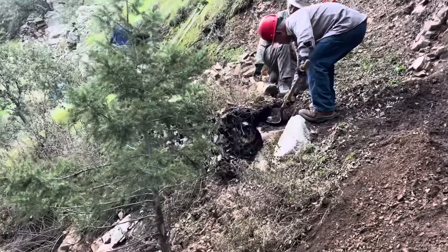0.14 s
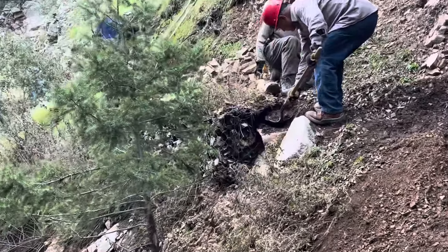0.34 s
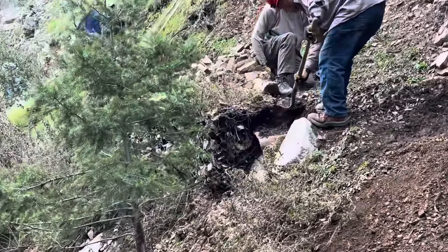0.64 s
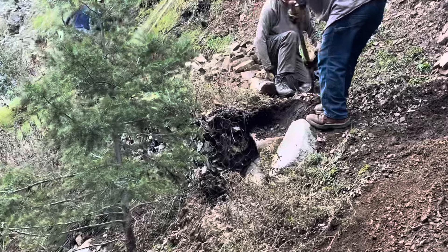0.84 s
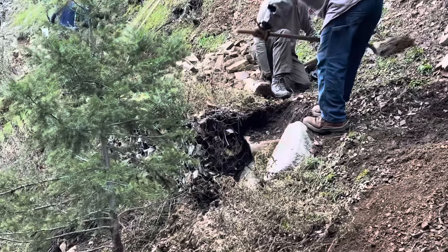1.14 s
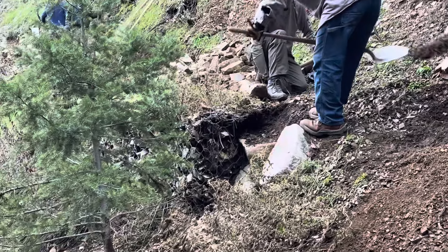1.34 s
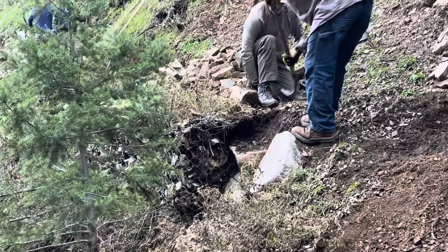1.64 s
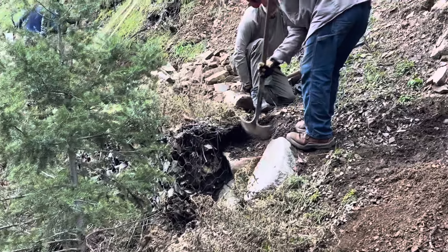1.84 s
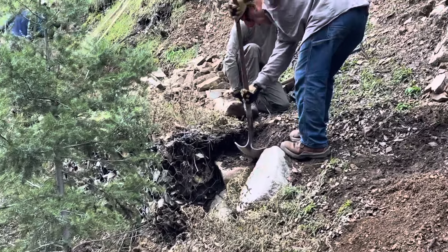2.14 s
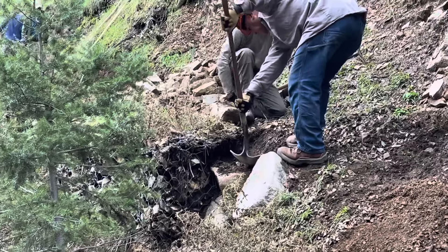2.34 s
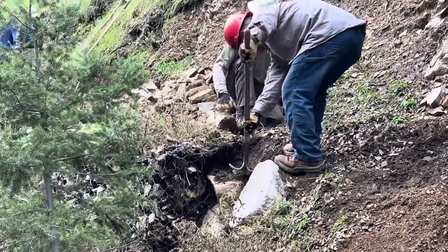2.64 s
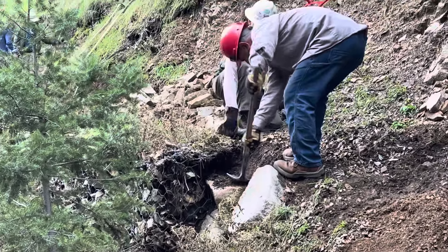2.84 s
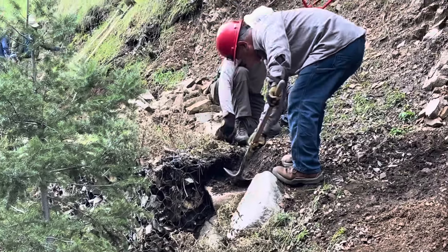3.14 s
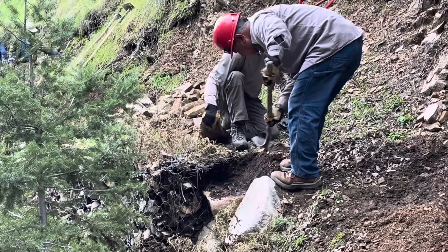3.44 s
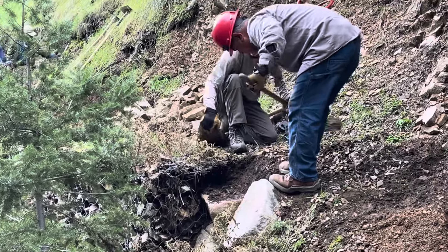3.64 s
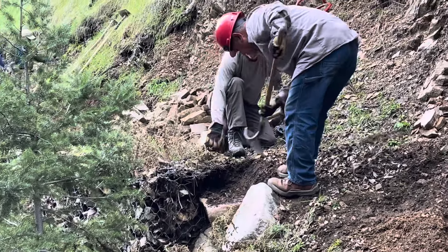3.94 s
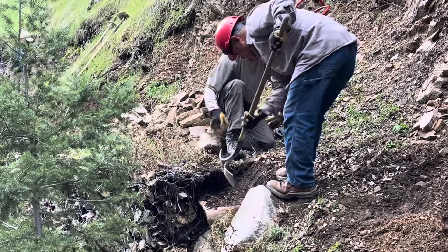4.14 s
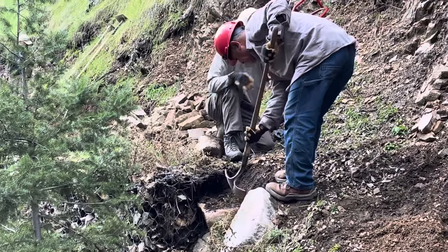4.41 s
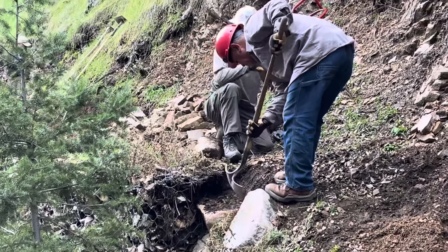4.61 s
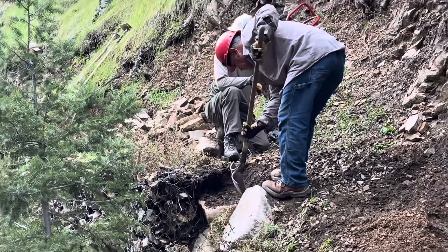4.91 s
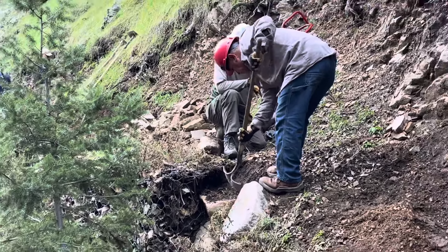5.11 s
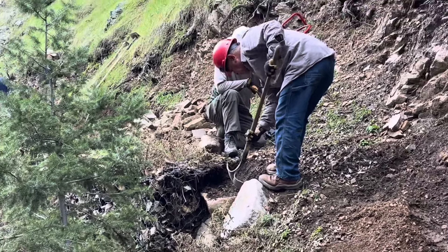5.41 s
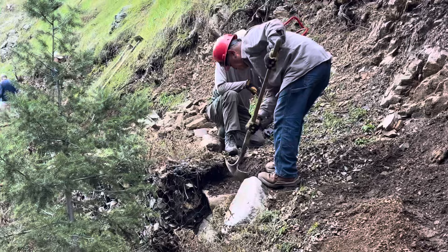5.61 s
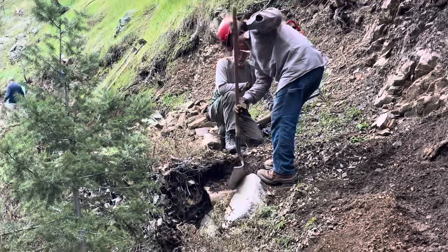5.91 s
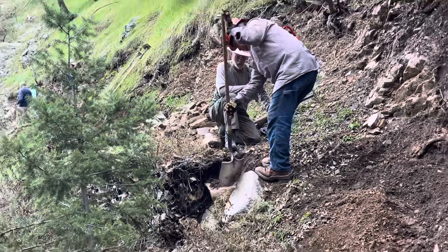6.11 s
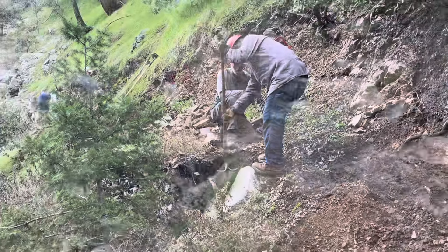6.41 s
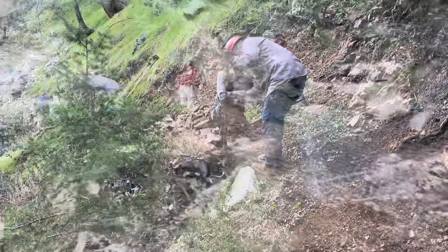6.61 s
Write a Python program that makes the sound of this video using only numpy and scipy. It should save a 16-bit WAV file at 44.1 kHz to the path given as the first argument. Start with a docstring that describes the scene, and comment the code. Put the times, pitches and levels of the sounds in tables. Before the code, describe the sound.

A steel shovel digs stony ground a few metres from a stereo microphone on an open hillside, over a quiet valley hush. From 0 to 1 s, dry grit and dull soil shift in short strokes, with low soft thuds and pebble ticks. Light, faintly ringing scrapes touch stone at 1.0-1.3 s; more pebbles click near 1.5. At 2.0 s a fast, hard volley crunches and clanks, then gravel scrapes and slides until about 3 s with a very faint rising hollow tone. A weak breeze rumble fades out by then. From 3 to 4.2 s only sparse grit and stone ticks remain. A heavy double crunch lands at 4.3 s, a looser cluster of clanks at 4.8-5.1, then scraping spills. A sharp single blow with a bright pebble click comes at 5.9, and a dense final volley at 6.3-6.5, trailing into trickling earth. Rings are short and damped, the slope's echo faint.

```python
"""A steel shovel digs into a stony hillside a few metres away, in the open air, heard through two microphone ports.
Under a quiet valley hush, grit trickles, clods thud and pebbles tick; a breeze rumbles on the microphone, gone by 3 s.
Light blows from 1 s are bursts of fractures ringing the blade's modes; a heavy volley bites at 2 s, then the load
scrapes and slides on with a rising hollow note. Heavy blows return near 4.3, 4.8, 5.9 and 6.4 s, each followed by
scraping grit. Throughout, nearby ground scatters the sound (noise tails) and the slope adds a faint short echo."""
import sys
import numpy as np
from scipy import signal
from scipy.fft import rfft, irfft, next_fast_len
from scipy.io import wavfile
from scipy.ndimage import uniform_filter1d

SR = 44100
rng = np.random.default_rng(int(sys.argv[2]) if len(sys.argv) > 2 else 0)


def int16_out(signal):
    """Quantize to a 16-bit WAV file."""
    q = np.round(np.clip(np.atleast_2d(signal).T, -1, 1) * 32767)
    wavfile.write(sys.argv[1], SR, q.astype(np.int16))


N = 298288
TIME = np.arange(N) / SR
RING_TIME = TIME[:SR // 2]  # half a second, the longest single event

# Blade meets stone. Each row: start [s], crunch level [dB], crunch decay to 1/e [s], ring re crunch [dB],
# blade flex [dB], freedom [0 buried to 1 in air], tilt [dB/octave], stone pitch [Hz], stone level [dB].
BLOWS = [(1.017, -50, 0.056, -3, -74, .94, -3, 1250, -49),
         (1.160, -47, 0.019, -7, -74, 0.33, -6, 1515, -49.5),
         (1.313, -48, 0.013, 9, -84, 0.9, 4, 4180, -51),
         (1.990, -28, .013, -3.5, -47, 0.48, -3.5, 2050, -39),
         (2.017, -30, 0.034, -0.5, -47, 0.31, 1.5, 3650, -28),
         (2.028, -24.5, 0.01, -1, -35, 0.3, 2.5, 2790, -26.5),
         (2.056, -28, .015, -19, -31, 0.49, -5, 1157, -29),
         (2.068, -35.5, 0.028, -8.5, -23, 0.3, .2, 3790, -33),
         (2.436, -46, 0.017, 3, -60, .33, -5, 625, -52), (2.914, -48, .029, -5, -62, 0.3, 0, 2950, -36.5),
         (4.2614, -27, 0.01, -4.5, -35, 0.17, -0.5, 700, -26),
         (4.267, -26, .015, 2.5, -36.5, 0.18, -1.8, 1147, -34),
         (4.279, -33.5, 0.031, -5, -41.5, 0.48, 0.3, 510, -27.5),
         (4.364, -43.5, 0.016, -18, -72, 0.4, -2.5, 3620, -50),
         (4.389, -48.5, 0.0052, 10.5, -74, 0.64, 0.4, 2900, -43.5),
         (4.777, -32, 0.02, 1.5, -41, 0.62, -2.5, 1560, -52),
         (4.847, -37, 0.012, 4.5, -63, 0.52, 1.5, 1876, -30),
         (4.88, -33, 0.029, -10.5, -53, 0.7, -1, 2105, -30.5),
         (4.892, -38.5, 0.045, -9.5, -59, 0.29, 3.5, 1867, -32),
         (4.952, -39.5, 0.011, -9, -65, .39, 1, 2080, -42),
         (5.091, -47, 0.019, 4, -51, 0.27, -6.5, 705, -45.5),
         (5.564, -41, 0.015, -12, -76, 0.34, -2.2, 1720, -45),
         (5.6, -54.5, 0.059, -3, -77, 0.6, 0, 2950, -49),
         (5.907, -28.5, 0.0087, -2.5, -42, 0.94, 0, 822, -31.5),
         (6.331, -29.5, 0.012, -5, -48.5, 0.99, 0, 920, -32.5),
         (6.404, -31, 0.041, -3, -33.5, 0.53, 0, 1250, -31.5),
         (6.428, -26, 0.0068, -5, -36, 0.43, 7, 1000, -27.5),
         (6.461, -32, 0.027, -15, -38.5, .55, -4.5, 2560, -48),
         (6.49, -31, 0.024, -4, -54, 0.15, -3, 952, -31.5),
         (6.511, -38.5, 0.013, -10, -32.5, .22, 6, 2700, -43),
         (6.7232, -49, 0.0085, 2, -62, 0.22, 9, 590, -50.5)]
# Modes of the blade. Each row: pitch [Hz], level struck edge-on [dB],
# level when stones glance along the face [dB], time to die by 60 dB when free [s].
BLADE = [(318, -14, -7, .22), (545, -5, -8, .2), (704, -4, -12, .22), (826, -4, -14, .18),
         (978, -2, -12, .27), (1100, -6, -7, .2), (1230, -7, -11, .22), (1462, -4, -16, .28),
         (1600, -7, -20, .58), (1712, 0, -13, .45), (1780, -3, -18, .22), (1854, -1, -15, .3),
         (1927, 1, -13, .35), (2122, -3, -13, .28), (2350, -4, -4, .24), (2594, -6, 1, .38),
         (2804, -3, -2, .3), (2975, -3, -8, .22), (3215, -6, -9, .22), (3391, -7, -6, .27),
         (3448, -3, -10, .22), (3621, -4, -7, .22), (3705, -7, -6, .27), (4114, -9, 1, .28),
         (4176, -3, -6, .28), (4580, -8, -6, .18), (5205, -5, -10, .17), (5530, -7, -8, .2),
         (8380, -13, -14, .18), (8820, -12, -12, .13)]
# Pebbles knocking together. Each row: start [s], peak [dB], pitch [Hz], time for the chatter to die by 60 dB [s].
PEBBLES = [(.154, -42, 2000, 0.034), (.366, -32, 820, 0.065), (.381, -38, 2000, 0.012),
           (.409, -36, 1810, .012), (.639, -37.5, 4550, 0.043), (.919, -45, 885, 0.022),
           (1.2527, -34, 4160, .0091), (1.266, -38, 4400, 0.22), (1.469, -39, 4660, 0.0038),
           (1.509, -33, 3620, .025), (1.55, -31.5, 3930, 0.0071), (2.0228, -23, 3680, 0.0038),
           (2.329, -35.5, 4240, .012), (2.468, -26.5, 3080, 0.032), (2.508, -32.5, 3730, 0.031),
           (2.601, -36.5, 3070, 0.011), (3.344, -33.5, 3630, 0.081), (3.357, -32.5, 3460, 0.057),
           (3.542, -39, 7040, 0.013), (3.616, -47, 3620, 0.082), (4.101, -46.5, 6900, 0.0069),
           (4.3917, -34, 2900, 0.026), (4.572, -42.5, 1930, .025), (4.627, -40.5, 1970, 0.13),
           (5.31, -37, 2800, 0.014), (5.9076, -24.5, 5500, .07)]
# Clods, boots and the loaded blade on the ground. Each row: start [s], level [dB], pitch [Hz].
THUDS = [(.003, -40, 124), (.058, -46.5, 110), (.177, -34.5, 69.4), (.346, -37.5, 285), (0.717, -47.5, 175),
         (0.919, -36, 218), (1.336, -47, 213), (1.515, -34, 140), (1.522, -30.5, 73.7), (2.222, -41, 224),
         (2.983, -45, 297), (3.835, -44.5, 70), (4.279, -41.5, 76.7), (4.721, -48.5, 168),
         (4.785, -39, 205), (4.805, -39.5, 73.5), (4.86, -46, 80), (5.330, -50, 99), (5.42, -47.5, 121),
         (5.909, -40, 192), (6.405, -39, 170), (6.49, -36.5, 210), (6.555, -44.5, 74), (6.689, -42.5, 72)]
# Spectrum of crushed stone. Each row: frequency [Hz], level [dB].
CRUNCH_SPECTRUM = [(80, -19), (250, -23.5), (550, -10.5), (1300, -6), (2000, 0), (3700, 2), (5200, -3),
                   (6500, 0), (8800, -5.5), (10500, -9.5), (13000, -13.5), (14200, -30.5), (16000, -28.5)]
# Spectrum of dry grit. Each row: frequency [Hz], level [dB].
GRIT_SPECTRUM = [(400, -34.5), (1200, -21), (2000, -2), (3200, -3), (5000, -6), (6500, -3.5), (9000, -7.5),
                 (11000, -10.5), (13000, -13), (14000, -28.5), (16000, -19)]
# Spectrum of deep soil. Each row: frequency [Hz], level [dB].
SOIL_SPECTRUM = [(50, 12.5), (130, -2), (300, -0.5), (850, -2.5), (1400, -6), (2000, -4.5), (3500, -42.5),
                 (8000, -30)]
# Spectrum of the distant valley air. Each row: frequency [Hz], level [dB].
HUSH_SPECTRUM = [(20, -20), (45, -6.5), (70, 4), (130, -8), (400, -5.5), (1000, -10.5), (1800, -2),
                 (2500, -22), (5000, -33), (9000, -19), (13000, -33.5), (16000, -42.5)]
# The two microphone ports. Each row: frequency [Hz], phase by which left leads [radians].
PORT_PHASE = [(60, 0), (400, -.2), (1100, .8), (1800, -.35), (2500, .1), (5100, 0), (6800, -np.pi),
              (8300, -2 * np.pi), (9900, -2 * np.pi), (12200, -3 * np.pi), (13600, -3 * np.pi),
              (15000, -4 * np.pi)]
# Spectrum scattered in from the sides by the nearby ground. Each row: frequency [Hz], level [dB].
SCATTER_SPECTRUM = [(60, -3), (300, 5), (700, 5), (1500, 18.5), (2000, 13), (2600, -0.5), (3300, 4),
                    (4500, -38.5), (6300, -20), (9000, -32), (11500, 2), (15000, 5)]
# Strokes of the blade and spills of earth. Each row: start [s], swell [s], hold [s],
# time to die by 60 dB [s] (negative: stops within 1 ms), dry grit [dB], deep soil [dB], before the mix in scrape().
STROKES = [(0, 0.0044, .005, -0.18, -57, -47), (0.069, 0.016, .005, 0.5, -53, -76),
           (0.154, 0.0044, 0.024, .16, -48, -45), (0.156, 0.041, 0.098, 0.5, -52.5, -62),
           (0.322, 0.027, .045, 0.25, -49, -45.5), (.4, 0.046, 0.009, 0.24, -55.5, -57),
           (0.577, 0.051, .01, 0.1, -49.5, -62), (1.063, 0.099, 0.14, 0.44, -50.5, -69.5),
           (1.49, 0.019, 0.027, 0.24, -46.5, -55), (1.749, .02, 0.021, -3, -63, -63.5),
           (2.033, 0.069, .035, 0.63, -45.5, -50), (2.25, 0.11, 0.17, 0.5, -54, -59),
           (2.438, .028, .01, 0.6, -45.5, -55.5), (2.57, 0.035, 0.0063, 0.09, -45.5, -50),
           (2.55, 0.29, 0.11, 0.4, -41.5, -71), (3.081, 0.084, 0.017, 0.14, -53, -66),
           (3.333, 0.0096, 0.011, 0.41, -48, -70), (3.572, 0.13, 0.12, 0.9, -53, -66.5),
           (4.346, 0.11, 0.068, 0.27, -50.5, -67), (4.615, 0.14, 0.37, 0.1, -55.5, -62.5),
           (5.079, 0.014, .005, 0.47, -43.5, -61), (5.201, 0.066, 0.0071, 0.36, -44, -60.5),
           (5.556, 0.048, 0.012, 0.4, -51.5, -70), (5.778, 0.021, .008, .16, -56.5, -72),
           (5.839, 0.067, 0.043, .6, -55.5, -60), (6.336, 0.021, .05, -0.5, -55, -56.5),
           (6.486, 0.035, 0.026, 0.8, -54.5, -59.5), (6.714, .008, .012, -0.5, -50, -51)]
# Loose earth trickling on. Each row: time [s], dry grit [dB], deep soil [dB], before the mix in scrape().
TRICKLE = [(0, -62, -55.5), (.8, -64, -60.5), (.98, -73, -62.5), (1.4, -68.5, -64), (2.3, -63, -62.5),
           (3.3, -69, -76), (3.5, -65.5, -70.5), (4.2, -80.5, -77), (5.35, -73, -69), (5.52, -78, -79),
           (5.85, -67.5, -73), (6.2, -85, -71.5), (6.7, -62.5, -63.5)]
# A light breeze on the microphone. Each row: time [s], level [dB].
BREEZE = [(0, -68), (.6, -69), (.8, -60.5), (1.3, -64.5), (1.8, -71), (2.15, -60), (2.4, -74), (3, -96)]

HUSH_DB = -68.5
BREEZE_HZ = 62.3
TOP_HZ = 15800
# the whole blade bending on its neck; the 60 dB decay is that of a free blade
FLEX_HZ, FLEX_T60_S = 468, 0.51
# smaller stones roll off at random; level and pitch are the middle of their spread
STRAY_PER_S, STRAY_DB, STRAY_HZ, STRAY_T60_S = 2, -54.5, 4500, .009
# soft ground dies by 60 dB within the same number of cycles at any pitch
THUD_CYCLES = 12.7
# every blow also shakes the ground, at a level relative to the blow
SHUDDER_DB, SHUDDER_HZ, SHUDDER_T60_S = -23, 124, 0.25
# the hollow between blade and ground as the load slides on; its pitch rises steadily from SCOOP_HZ
SCOOP_S, SCOOP_LENGTH_S, SCOOP_FADE_S = 2.4, 0.635, 0.078
SCOOP_HZ, SCOOP_OCTAVES_PER_S, SCOOP_DB = 617, 1.4, -62.5


def undb(db):
    """Decibels to gain."""
    return 10 ** (np.asarray(db) / 20)


def unit(x):
    """Scale to rms 1."""
    return x / np.sqrt(np.mean(x ** 2))


def fade(t60):
    """A free decay by 60 dB in t60 seconds."""
    return np.exp(-np.log(1000) * RING_TIME / t60)


def add(track, at, sound):
    """Mix a sound into a track at a time in seconds."""
    start = int(at * SR)
    track[start:start + len(sound)] += sound[:max(N - start, 0)]


def along(points, hz):
    """Read (Hz, value) points on a log-frequency axis."""
    f, value = np.transpose(points)
    return np.interp(np.log(hz + 1), np.log(f), value)


def octaves(hz):
    """Distance from the middle of the steel's range, held constant below 300 Hz."""
    return np.log2(np.maximum(hz, 300) / 2500)


def colour(x, points, tilt=0, size=2048):
    """Causal (minimum-phase) filter with the given spectrum and unit power gain."""
    hz = np.arange(size // 2 + 1) * SR / size
    level_db = along(points, hz) + tilt * octaves(hz)
    # folding the cepstrum forward in time makes the response causal
    cepstrum = irfft(np.log(undb(level_db)))
    cepstrum[1:size // 2] *= 2
    cepstrum[size // 2 + 1:] = 0
    response = irfft(np.exp(rfft(cepstrum)))
    return signal.fftconvolve(x, response / np.linalg.norm(response))[:len(x)]


def walk(rate):
    """Slow random wandering, renewed at a rate in Hz, with a spread near 1."""
    hold = max(int(SR / rate), 1)
    steps = np.repeat(rng.standard_normal(N // hold + 1), hold)
    return unit(uniform_filter1d(steps, hold))[:N]


def grains(count, per_s, spread_db):
    """Tiny fractures at random moments: many small, a few large."""
    when = np.flatnonzero(rng.random(count) < per_s / SR)
    size = undb(spread_db * np.minimum(rng.exponential(size=len(when)), 5))
    train = np.zeros(count)
    train[when] = size * rng.choice([-1, 1], len(when))
    return unit(train)


def hush(shared=0.52):
    """Distant air in the valley: coloured noise, wavering slightly, partly the same on both sides."""
    def air():
        """One wavering stream of noise."""
        noise = unit(colour(rng.standard_normal(N), HUSH_SPECTRUM))
        return noise * undb(2.9 * walk(0.43) + .8 * walk(25))
    common, left, right = air(), air(), air()
    return undb(HUSH_DB) * (np.sqrt(shared) * common + np.sqrt(1 - shared) * np.array([left, right]))


def breeze(flutter_db=2.0):
    """Moving air on the microphone rumbles unevenly in the deep bass."""
    spectrum = [(BREEZE_HZ / 3, -24), (BREEZE_HZ, 0), (BREEZE_HZ * 2, -12),
                (BREEZE_HZ * 8, -45), (BREEZE_HZ * 64, -80)]
    rumble = colour(rng.standard_normal(N), spectrum)
    level_db = np.interp(TIME, *np.transpose(BREEZE))
    return unit(rumble * undb(flutter_db * walk(8.4))) * undb(level_db)


def effort():
    """Gain of the grit and of the deep soil: each stroke swells, holds and dies away over the trickle."""
    s, *trickle_db = np.transpose(TRICKLE)
    power = np.array([undb(np.interp(TIME, s, db)) ** 2 for db in trickle_db])
    for at, swell, hold, t60, grit_db, soil_db in STROKES:
        push = np.clip((TIME - at) / swell, 0, 1) ** 2
        since_release = (TIME - at - swell - hold) / max(t60, 1e-3)
        release = np.exp(-np.log(1000) * np.clip(since_release, 0, 2))
        power += np.outer(undb([grit_db, soil_db]), push * release) ** 2
    return np.sqrt(power)


def gravel(low_hz, high_hz, sharpness, per_s, count):
    """Loose pieces of many sizes, each clicking at its own pitch; the small high ones are the most numerous."""
    total = np.zeros(N)
    for hz in np.geomspace(low_hz, high_hz, count):
        clicks = grains(N, per_s * hz / low_hz, 1.4)
        total += signal.lfilter(*signal.iirpeak(hz, sharpness, fs=SR), clicks)
    return unit(total)


def blade_response(freedom, glance):
    """The blade's ring after one tap: the contact decides which modes sound, and soil damps them."""
    hz, edge_db, face_db, t60 = np.transpose(BLADE)
    place_db = rng.standard_normal(len(hz))  # where on the blade the tap falls
    gain = undb(edge_db + glance * (face_db - edge_db) + place_db) * rng.choice([-1, 1], len(hz))
    return sum(g * np.sin(2 * np.pi * f * RING_TIME) * fade(t * freedom) for f, g, t in zip(hz, gain, t60))


def scrape(judder_db=1.13, steel_db=-10, sand_db=-4, coarse_db=-8, slip_db=-4.5, crumb_db=-2.0):
    """Gravel and sand slip along the blade, which sings faintly; deeper soil breaks up in dull lumps."""
    grit, soil = effort() * undb(judder_db * walk(110))
    stones = gravel(1200, 13000, 26, 45, count=36)
    lumps = gravel(170, 2200, 9, 110, count=16)
    coarse = gravel(1800, 5500, 30, 9, count=14)
    sand = grains(N, 7000, 1.3)
    loose = unit(stones + undb(coarse_db) * coarse + undb(sand_db) * sand)
    slips = loose * grit * undb(slip_db)
    crumbs = unit(colour(lumps, SOIL_SPECTRUM)) * soil * undb(crumb_db)
    steel = blade_response(freedom=0.32, glance=0.56)
    singing = signal.fftconvolve(slips, steel / np.linalg.norm(steel))[:N]
    return colour(slips, GRIT_SPECTRUM) + undb(steel_db) * singing + crumbs


def settling(hz):
    """The dull rumble of loose earth around a pitch."""
    spectrum = [(hz / 4, -24), (hz / 1.77, -2), (hz * 1.4, -2), (hz * 4, -20), (hz * 16, -55)]
    return colour(rng.standard_normal(len(RING_TIME)), spectrum)


def thuds(rumble_db=-9, attack_s=0.0029):
    """Soft ground gives in a damped low tone while loose earth settles; it also shudders under every blow."""
    out = np.zeros(N)
    onset = 1 - np.exp(-RING_TIME / attack_s)
    for at, db, hz in THUDS:
        give = np.sin(2 * np.pi * hz * RING_TIME)
        thud = (give + undb(rumble_db) * settling(hz)) * fade(THUD_CYCLES / hz) * onset
        add(out, at, undb(db) * thud)
    for at, db, *_ in BLOWS:
        shudder = settling(SHUDDER_HZ) * fade(SHUDDER_T60_S) * onset
        add(out, at, undb(db + SHUDDER_DB) * shudder)
    return out


def strays(spread_db=4, spread_octaves=.7):
    """Small stones that roll off at random moments, each with its own size and pitch."""
    stones = []
    for when, size, pitch in rng.uniform(-1, 1, (int(STRAY_PER_S * N / SR), 3)):
        at = (when + 1) / 2 * N / SR
        hz = STRAY_HZ * 2 ** (spread_octaves * pitch)
        stones.append((at, STRAY_DB + spread_db * size, hz, STRAY_T60_S))
    return stones


def pebbles(chatter_db=-9):
    """A sharp tick and a brief dying chatter of noise in the stone's broad resonance."""
    out = np.zeros(N)
    for at, db, hz, t60 in list(PEBBLES) + strays():
        contact = undb(chatter_db) * rng.standard_normal(len(RING_TIME)) * fade(t60)
        contact[0] = 1
        resonance = [(hz / 5, -22), (hz / 1.17, -6), (hz, 0), (hz * 1.4, -6), (hz * 4, -22), (hz * 12, -50)]
        tick = colour(contact, resonance)
        add(out, at, undb(db) * tick / np.abs(tick).max())
    return out


def blows(stone_t60=0.09, rattle=0.78, bite_s=0.00085, push_s=0.0022):
    """A dying burst of fractures crushes grit and rings the steel; the stone knocks and the push bends the blade."""
    out = np.zeros(N)
    for at, db, decay, ring_db, flex_db, freedom, tilt, stone_hz, stone_db in BLOWS:
        contact = np.exp(-RING_TIME / decay)
        force = grains(len(RING_TIME), 5000, 2.85) * contact * (1 - np.exp(-RING_TIME / bite_s))
        crunch = colour(force, CRUNCH_SPECTRUM, tilt)
        # the bright blows are the glancing ones
        steel = blade_response(freedom, np.clip(tilt / 2, 0, 1))
        # the modes build up while the contact lasts, and the fractures shake them unevenly
        build_up = steel * np.sqrt(1 - contact ** 2)
        shaken = signal.fftconvolve(force / np.linalg.norm(force), steel)[:len(force)]
        ring = build_up + rattle * shaken
        ring *= np.linalg.norm(crunch) / np.linalg.norm(ring)
        push = 1 - np.exp(-RING_TIME / push_s)
        flex = np.sin(2 * np.pi * FLEX_HZ * RING_TIME) * fade(FLEX_T60_S * freedom)
        knock = np.sin(2 * np.pi * stone_hz * RING_TIME) * fade(stone_t60)
        impact = undb(db) * (crunch + undb(ring_db) * ring)
        add(out, at, impact + push * (undb(flex_db) * flex + undb(stone_db) * knock))
    return out


def scoop(width_hz=190):
    """Crumbling earth sounds the hollow under the blade, whose pitch rises as it fills."""
    since = np.clip(TIME - SCOOP_S, 0, SCOOP_LENGTH_S)
    lowpass = signal.butter(2, width_hz, fs=SR, output="sos")
    rub = unit(signal.sosfilt(lowpass, grains(N, 1500, 3.0)))
    hz = SCOOP_HZ * 2 ** (SCOOP_OCTAVES_PER_S * since)
    phase = 2 * np.pi * np.cumsum(hz) / SR
    sliding = np.minimum(np.minimum(since, SCOOP_LENGTH_S - since) / SCOOP_FADE_S, 1)
    return unit(rub * np.sin(phase)) * undb(SCOOP_DB) * sliding


def reflect(x, t60, points):
    """A dense, dying spray of reflections: convolution with coloured, decaying noise."""
    spray = rng.standard_normal(len(RING_TIME)) * fade(t60) * (1 - np.exp(-RING_TIME / (t60 / 20)))
    tail = colour(spray, points)
    return signal.fftconvolve(x, tail / np.linalg.norm(tail))[:N]


def ports(x):
    """Sound reaches the two microphone ports out of step: half the phase lead on one, half the lag on the other."""
    size = next_fast_len(N + SR // 10)
    hz = np.arange(size // 2 + 1) * SR / size
    turn = np.exp(.5j * along(PORT_PHASE, hz))
    spectrum = rfft(x, size)
    return np.array([irfft(spectrum * turn, size)[:N], irfft(spectrum / turn, size)[:N]])


def scene(ground_db=-14, slope_db=-27):
    """The digging, its scatter off the nearby ground and the slope, the valley behind and the breeze."""
    dig = blows() + scrape() + scoop() + pebbles() + thuds()
    # opposite polarity left and right puts the scatter at the sides
    ground = reflect(dig, 0.017, SCATTER_SPECTRUM) * np.array([[1], [-1]])
    slope_spectrum = [(100, -1.5), (1500, 2), (3500, -29.5), (12000, -12)]
    slope = np.array([reflect(dig, 0.34, slope_spectrum) for _ in range(2)])
    return ports(dig) + undb(ground_db) * ground + undb(slope_db) * slope + hush() + breeze()


def record(dry):
    """The recorder drops the deepest bass and cuts the top."""
    bass_cut = signal.butter(2, 45, "high", fs=SR, output="sos")
    top_cut = signal.ellip(8, .2, 70, TOP_HZ, fs=SR, output="sos")
    return signal.sosfilt(top_cut, signal.sosfilt(bass_cut, dry))


dry = scene()
out = record(dry)
int16_out(out)
```